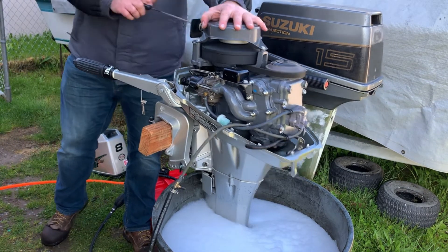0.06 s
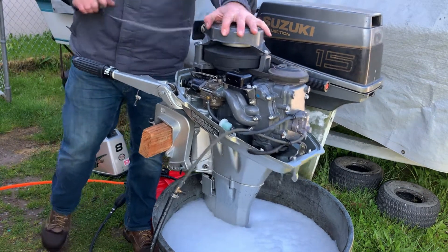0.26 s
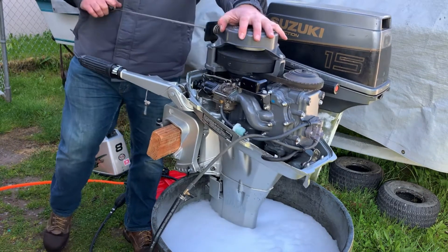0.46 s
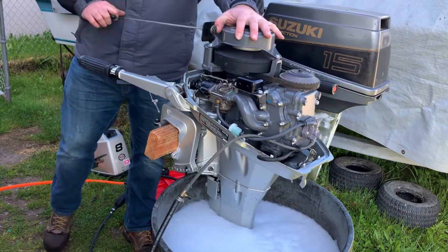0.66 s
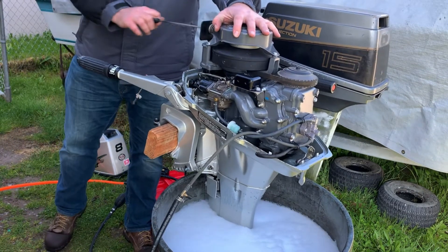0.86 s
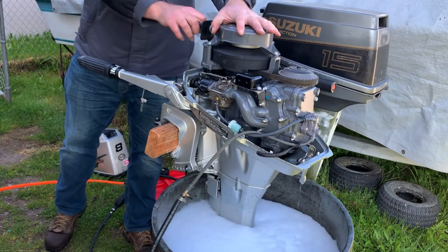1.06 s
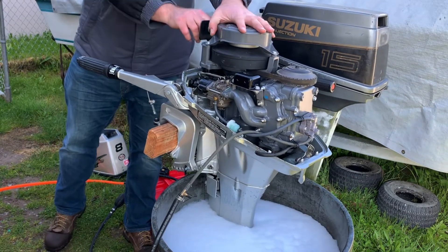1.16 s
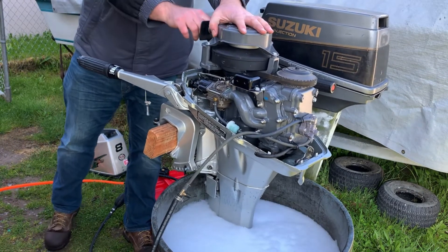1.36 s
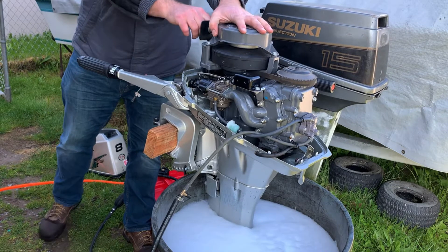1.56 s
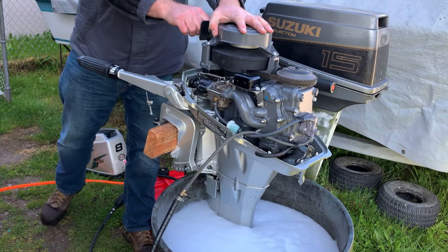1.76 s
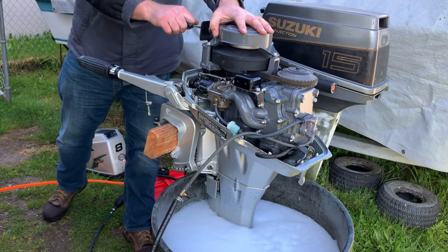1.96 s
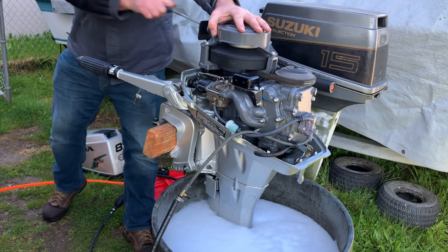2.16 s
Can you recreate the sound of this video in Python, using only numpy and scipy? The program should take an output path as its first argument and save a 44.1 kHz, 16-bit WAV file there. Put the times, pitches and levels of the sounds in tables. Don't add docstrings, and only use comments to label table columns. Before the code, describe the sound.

Sharp metallic ratchet clatter on a silent small outboard engine, loudest in the first half second, then a few clicks, soft thuds and a late weaker rattle, over faint distant traffic and engine drone in a yard.

```python
import sys
import numpy as np
from scipy import signal
from scipy.fft import rfft, irfft
from scipy.io import wavfile

SR = 44100
rng = np.random.default_rng(int(sys.argv[2]) if len(sys.argv) > 2 else 0)


def volts_from_decibels(level):
    exponent = np.asarray(level, float) / 20
    return 10 ** exponent


def to_wav(s):
    ch = np.atleast_2d(s).T
    pcm = np.round(np.clip(ch, -1, 1) * 32767)
    wavfile.write(sys.argv[1], SR, pcm.astype(np.int16))


N = 97020
FFT_HZ = np.arange(N // 2 + 1) * SR / N


def rms_one(x):
    return x / np.sqrt(np.mean(x ** 2) + 1e-20)


def in_time(rows):
    t_s, *columns = np.transpose(rows)
    return [np.interp(np.arange(N) / SR, t_s, column) for column in columns]


def at_hz(points, hz):
    point_hz, value = np.transpose(points)
    return np.interp(np.log(hz + 1), np.log(point_hz + 1), value)


def drift(rate_hz):
    r = np.exp(-80 * np.pi * rate_hz / SR)
    white = rng.standard_normal(N // 40 + 2002)
    slow = signal.lfilter([1], [1, -2 * r, r * r], white)[2000:]
    return np.interp(np.arange(N) / 40, np.arange(len(slow)), rms_one(slow))


def narrow_noise(turn, width_hz, steady=0):
    return (steady + drift(width_hz)) * np.cos(turn) + drift(width_hz) * np.sin(turn)


def bandpass(x, low_hz, high_hz, order=2):
    return signal.sosfilt(signal.butter(order, [low_hz, high_hz], "band", fs=SR, output="sos"), x)


def lowpass(x, cut_hz):
    return signal.lfilter(*signal.butter(2, cut_hz, fs=SR), x)


def ring(x, hz, t60_s):
    r, w = volts_from_decibels(-60 / (t60_s * SR)), 2 * np.pi * hz / SR
    gain = 2 * np.sin(w) * np.sqrt(1 - r)
    return signal.lfilter([0, gain], [1, -2 * r * np.cos(w), r * r], x + 1e-18)


def coloured(spectrum, white):
    inside = (FFT_HZ > spectrum[0][0]) & (FFT_HZ < spectrum[-1][0])
    return rms_one(irfft(rfft(white) * volts_from_decibels(at_hz(spectrum, FFT_HZ)) * inside, N))


def grains(size):
    strength_db = 3.5 * np.minimum(rng.exponential(1, size), 4)
    return rms_one(volts_from_decibels(strength_db) * rng.standard_normal(size))


# f/Hz, density/dB [dB per Hz]
TRAFFIC_SPECTRUM = [(20, -29.5), (48, -13), (70, -2.5), (110, -9), (350, -23.5), (900, -32), (2800, -44),
                    (4800, -62.5), (16000, -63.5)]
# f/Hz, likeness/1 [0..1]
FAR_LIKENESS = [(30, 0.8), (100, .9), (300, 0.39), (1000, 0.25), (3000, 0.43), (8000, 0.56)]
TRAFFIC_DB = -50


def traffic():
    alike = np.clip(at_hz(FAR_LIKENESS, FFT_HZ), 0, 1)
    mid, side = (rfft(coloured(TRAFFIC_SPECTRUM, rng.standard_normal(N))) for _ in range(2))
    mid = np.sqrt(.5 + alike * .5) * mid
    side = np.sqrt(.5 - alike * .5) * side
    pair = np.array([irfft(mid + side, N), irfft(mid - side, N)])
    return volts_from_decibels(TRAFFIC_DB + .5 * drift(2.4)) * pair


# t/s, f/Hz, level/dB
ENGINE_PITCH = [(0, 73.38, -62), (.3, 79.92, -79), (.55, 67.64, -49.5), (.85, 74.37, -69.5),
                (1.15, 67.06, -54), (1.44, 71.1, -38.5), (1.6, 67.4, -60), (1.7, 82.34, -60.5),
                (1.93, 76.8, -40.5), (2.05, 69.5, -79), (2.2, 70.8, -67.5)]
ENGINE_WIDTH_HZ = 6
HUM_HZ, HUM_WIDTH_HZ, HUM_DB = 124.6, 2.9, -59


def drone():
    hz, db = in_time(ENGINE_PITCH)
    engine = narrow_noise(2 * np.pi * np.cumsum(hz) / SR, ENGINE_WIDTH_HZ, steady=0.42) / 1.6
    hum = narrow_noise(2 * np.pi * HUM_HZ * np.arange(N) / SR, HUM_WIDTH_HZ)
    return volts_from_decibels(db) * engine + volts_from_decibels(HUM_DB) * hum


# t/s, level/dB, dull share/dB
ROPE_RUB = [(0, -69.5, -1), (.09, -65.5, 5), (.15, -48, -4), (.18, -51.5, -10), (.2, -55.5, 5.5),
            (.3, -56.5, 1), (.45, -62.5, -7), (.58, -71, 5.5), (.72, -66.5, 0), (.95, -65, -8.5),
            (1.05, -71, 2.5), (1.15, -80, 6.5), (1.74, -87.5, 11), (1.82, -59.5, -3), (1.96, -74, -3),
            (2.06, -77.5, -1.5), (2.14, -62.5, 6.5), (2.2, -61, 10.5)]
# f/Hz, density/dB [dB per Hz]
ROPE_HISS = [(1500, -2), (2500, -3.5), (4500, -6), (6800, -12), (9200, -6.5), (11600, -11.5),
             (14000, -14.5), (16000, -17)]
# f/Hz, density/dB [dB per Hz]
ROPE_DRAG = [(350, -16.5), (600, -3), (900, -4.5), (1400, -5.5), (1900, -16.5), (3000, -12.5)]
ROPE_RING_DB, ROPE_BOOM_GAIN = -11, .8


def rope():
    level_db, dull_db = in_time(ROPE_RUB)
    rub = grains(N)
    pawl = rms_one(sum(volts_from_decibels(db) * ring(rub, hz, METAL_T60_S) for hz, db in PAWL_MODES))
    bright = coloured(ROPE_HISS, rub) + volts_from_decibels(ROPE_RING_DB) * pawl
    drag = coloured(ROPE_DRAG, rng.standard_normal(N))
    boom = rms_one(sum(ring(drag, hz, 2 * HOUSING_T60_S) for hz, _ in HOUSING_MODES))
    dull = rms_one(drag + ROPE_BOOM_GAIN * boom) * volts_from_decibels(dull_db + drift(5))
    return volts_from_decibels(level_db + drift(18)) * (bright + dull)


def wide_rope():
    return rope() + volts_from_decibels(-0.5) * lowpass(rope(), 3000) * [[1], [-1]]


KNOCK_TIMES = [.012, .060, .224, .2322, .2727, .3398, .3535, .372, .376, .3795, .400, .438, .600, .6357,
               .652, .670, 1.085, 1.102, 1.7948, 1.806, 1.824, 1.830, 1.8585, 1.8615, 1.8978, 1.9015, 1.922,
               1.935]
# peak level/dB, housing share/dB, pawl share/dB, chatter length/s
KNOCK_FORCE = [(-41, 6.5, -7.5, 0.016), (-59, 16, -20, 0.018), (-26, -13, -11.5, 0.0046),
               (-15.5, -16, 2, 0.007), (-21.5, -10, 1.5, 0.0033), (-35, -15.5, 14, 0.0027),
               (-31, -11.5, -2, 0.027), (-26, -15.5, -6.5, .004), (-8.5, -6, -4.5, .003),
               (-13.5, 2.5, 0.5, 0.0073), (-27.5, -24, -7, 0.0049), (-47.5, 6.5, -24, 0.023),
               (-53, -14, -3, 0.0055), (-32.5, -8, -5, 0.0026), (-22.5, -23, -3.5, 0.0025),
               (-45, 8.5, -10.5, 0.003), (-45, -19.5, -17.5, 0.0028), (-42.5, -22, -28.5, 0.0015),
               (-32, -25, -3, 0.0036), (-40.5, -28, -4, 0.0033), (-40, -20, 8.5, 0.0025),
               (-43.5, -6, 6, 0.0067), (-34.5, 3.5, 4.5, 0.0033), (-28.5, 4, -8, 0.0016),
               (-25, -39, 6.5, 0.005), (-28, 14, -2, 0.006), (-31, 6.5, -9, 0.0088),
               (-34.5, -28, -26, 0.0017)]
# f/Hz, level/dB
HOUSING_MODES = [(210, -4), (294, -9.5), (450, -17), (590, -24.5), (680, 0), (957, 1), (1117, -2),
                 (1350, -13.5)]
# f/Hz, level/dB
CUP_MODES = [(1660, -1), (2200, 3), (2500, 2.5), (3170, 1), (3600, -1.5), (4460, 1.5), (5160, -4),
             (5650, -26), (6300, -15.5), (6950, -3), (7550, -18.5)]
# f/Hz, level/dB
PAWL_MODES = [(8200, -10.5), (8580, 8), (8940, -2), (9300, -4.5), (9640, 7.5), (10300, 4), (10800, -11),
              (12000, -15.5), (12500, -1.5), (13350, -7.5), (13750, -3.5), (14250, 2.5), (15000, -18)]
# contact t/s, f/Hz, level/dB
CONTACT_ACCENTS = [(.2322, 1315, 5.5), (.2322, 1610, 2), (.2322, 2280, 2), (.2727, 1685, 6),
                   (.2727, 1000, 2.5), (.2727, 2990, 9), (.3398, 8640, 29), (.3398, 13800, 10.5),
                   (.3398, 14200, 9), (.3795, 626, 5), (.3795, 914, 6.5), (.3795, 720, 0.5),
                   (.652, 2577, 5.5), (.652, 1046, -0.5), (.652, 700, -7), (1.7948, 1050, 2.5),
                   (1.824, 2250, 11), (1.9015, 1600, 9), (1.9015, 2100, 6), (.652, 3720, 1),
                   (1.085, 1393, 17.5), (1.102, 777, 17.5), (1.830, 8740, 22.5), (1.8615, 2840, 11.5),
                   (1.8615, 4100, 12)]
HOUSING_T60_S, METAL_T60_S, ACCENT_T60_S = .024, .009, .016
ATTACK_SHARE, CHATTER_T60_S, TAIL_DB, TAIL_T60_S = 0.04, 0.031, -21, 0.18
CRACK_LOW_HZ, CRACK_SPLIT_HZ, CRACK_HIGH_HZ = 800, 7000, 13500
CRACK_DB, CRACK_TOP_DB = 9.5, 14.5
COLOUR_DB, DETUNE = 2.0, .02


def chatter(t, length_s):
    attack = np.minimum(t / (ATTACK_SHARE * length_s), 1)
    after = np.maximum(t - length_s, 0)
    body = volts_from_decibels(-60 * after / CHATTER_T60_S - 1.45 * np.minimum(t / length_s, 1))
    tail = volts_from_decibels(TAIL_DB - 60 * t / TAIL_T60_S)
    return attack * (body + tail) * grains(len(t))


def metal(push, modes, share_db):
    out = 0
    for k, (hz, mode_db) in enumerate(modes):
        gain = (-1) ** k * volts_from_decibels(mode_db + share_db + COLOUR_DB * rng.normal())
        out = out + gain * ring(push, hz * rng.normal(1, DETUNE), METAL_T60_S)
    return out


def knocks():
    out, t = np.zeros(N + SR), np.arange(SR // 5) / SR
    for s, (db, housing_db, pawl_db, length_s) in zip(KNOCK_TIMES, KNOCK_FORCE):
        push = chatter(t, length_s)
        sound = volts_from_decibels(CRACK_DB) * bandpass(push, CRACK_LOW_HZ, CRACK_SPLIT_HZ, order=3)
        top = bandpass(push, CRACK_SPLIT_HZ, CRACK_HIGH_HZ)
        sound = sound + volts_from_decibels(CRACK_TOP_DB + pawl_db) * top
        for hz, mode_db in HOUSING_MODES:
            gain = volts_from_decibels(mode_db + housing_db + rng.normal())
            sound = sound + gain * ring(push, hz, HOUSING_T60_S)
        sound = sound + metal(push, CUP_MODES, 0) + metal(push, PAWL_MODES, pawl_db)
        for at_s, hz, accent_db in CONTACT_ACCENTS:
            if abs(at_s - s) < .0025:
                sound = sound + volts_from_decibels(accent_db) * ring(push, hz, ACCENT_T60_S)
        start = int(s * SR)
        out[start:start + len(t)] += volts_from_decibels(db - 21.5) * sound
    return signal.sosfilt(signal.butter(2, 310, "high", fs=SR, output="sos"), out[:N])


TICK_TIMES = [.0135, .2325, .2339, .2351, .2365, .2381, .2403, .2432, .2463, .2731, .2742, .2760, .3403,
              .3426, .3550, .3581, .3623, .3766, .3778, .3790, .3804, .3822, .3859, .3878, .3907, .3948,
              .4016, .6361, .6372, .6530, .6543, .6608, .6722, 1.0851, 1.1021, 1.7952, 1.7971, 1.8069,
              1.8254, 1.8319, 1.8368, 1.8605, 1.8622, 1.8641, 1.8982, 1.9006, 1.9019, 1.9060, 1.9091,
              1.9135, 1.9229, 1.9371]
# peak level/dB, bright over dull/dB
TICK_LEVELS = [(-46, -3), (-10, 10), (-14, 9), (-17, 6), (-15, 7), (-12, 10), (-22, 5), (-23, 5), (-25, 6),
               (-24, 3), (-19, 4), (-23, 4), (-24, 19), (-27, 19), (-26, 11), (-27, 13), (-36, 11),
               (-16, 12), (-19, 2), (-14, 6), (-10, 8), (-16, 0), (-17, 5), (-17, 7), (-25, 4), (-26, 4),
               (-32, 4), (-39, 6), (-40, 4), (-19, 7), (-27, -2), (-38, 8), (-40, 8), (-51, -14),
               (-48, -18), (-34, 6), (-36, 4), (-44, 5), (-43, 4), (-34, 12), (-36, 16), (-33, 1), (-31, 1),
               (-29, 6), (-19, 19), (-21, 19), (-26, 13), (-31, 6), (-27, 5), (-30, -1), (-40, -4),
               (-38, 1)]
TICK_LOW_HZ, TICK_SPLIT_HZ, TICK_HIGH_HZ = 650, 7000, 12800
TICK_T60_S, TICK_DB = .006, -1.5


def ticks():
    out, t = np.zeros(N + SR), np.arange(SR // 50) / SR
    for s, (db, bright_db) in zip(TICK_TIMES, TICK_LEVELS):
        white = rng.standard_normal(len(t))
        dull = rms_one(bandpass(white, TICK_LOW_HZ, TICK_SPLIT_HZ))
        bright = rms_one(bandpass(white, TICK_SPLIT_HZ, TICK_HIGH_HZ))
        snap = (dull + volts_from_decibels(bright_db) * bright) * volts_from_decibels(-60 * t / TICK_T60_S)
        start = int(s * SR)
        out[start:start + len(t)] += volts_from_decibels(db + TICK_DB) * snap / np.abs(snap).max()
    return out[:N]


# t/s, f/Hz, level/dB, t60/s
SOFT_THUDS = [
    (0.018, 380, -49, 0.035),
    (.064, 640, -39, .03),
    (.3805, 625, -18.5, .035),
    (1.902, 737, -31.5, 0.027),
    (.615, 283, -41, 0.043),
    (0.81, 96.6, -38.5, 0.086),
    (.93, 420, -40.5, 0.026),
    (1, 190, -49.5, 0.11),
    (0.861, 183, -46, 0.054),
]


def thuds():
    t, out = np.arange(N) / SR, 0
    for s, hz, db, t60_s in SOFT_THUDS:
        fade = volts_from_decibels(db - 60 * np.clip(t - s, 0, 1) / t60_s)
        onset = np.clip((t - s) / 0.0034, 0, 1)
        out = out + fade * onset * np.sin(2 * np.pi * hz * (t - s))
    return out


# start t/s, touched t/s, f/Hz
SPRING_MODES = [
    (.258, .340, 4684),
    (.245, .372, 5681),
    (.236, .300, 1667),
    (.280, .335, 8597),
    (.240, .320, 8093),
    (.285, .340, 13720),
    (1.815, 1.858, 5690),
]
SPRING_LEVELS = [-42, -46, -47, -60, -51.5, -61, -61.5]
SPRING_RISE_S, SPRING_STOP_S, SPRING_T60_S = .008, .007, 0.54


def spring():
    t, out = np.arange(N) / SR, 0
    for (start, stop, hz), db in zip(SPRING_MODES, SPRING_LEVELS):
        gate = np.clip((t - start) / SPRING_RISE_S, 0, 1) * np.clip((stop - t) / SPRING_STOP_S, 0, 1)
        fade = volts_from_decibels(db + 5.5 - 60 * np.clip(t - start, 0, 1) / SPRING_T60_S)
        out = out + gate * fade * np.sin(2 * np.pi * (hz * t + rng.random()))
    return out


# left lag t/s, right lag t/s, level/dB
YARD_ECHOES = [(.011, .014, -12.5), (0.024, .019, -18.5), (.037, .041, -31.5)]


def with_echoes(near):
    out, dull = np.array([near, near]), lowpass(near, 4500)
    for left_s, right_s, db in YARD_ECHOES:
        for side, lag_s in enumerate((left_s, right_s)):
            lag = int(lag_s * SR)
            out[side, lag:] += volts_from_decibels(db) * dull[:-lag]
    return out


def scene():
    blows, singing = knocks(), spring()
    rubbing = wide_rope()
    far = traffic() + drone()
    near = blows + ticks() + singing * volts_from_decibels(3.5 * drift(29.93))
    return with_echoes(near) + rubbing + thuds() + far


# low f/Hz, high f/Hz
SCATTER_BAND = (3600, 6800)
SCATTER_T60_S, SCATTER_DB = .012, -0.5


def scattered(pair):
    t = np.arange(SR // 100) / SR
    smear = rng.standard_normal(len(t)) * volts_from_decibels(-60 * t / SCATTER_T60_S)
    band = bandpass(pair.mean(axis=0), *SCATTER_BAND)
    smeared = np.convolve(band, smear / np.linalg.norm(smear))[:N]
    return pair + volts_from_decibels(SCATTER_DB) * smeared * [[1], [-1]]


# f/Hz, phase/rad
PORT_TURN = [(0, 0), (500, .2), (1000, .5), (1500, .25), (2000, .5), (3400, 1.6), (5800, 1.2), (7300, 2.4),
             (9300, 0), (10400, -1.5), (11650, -3.14), (12900, -4.6), (13900, -6.28), (16500, -9.6)]
# f/Hz, level/dB
PORT_LEAN = [(60, -.6), (300, -2.2), (1000, -1.2), (3000, -3), (5200, -6), (6500, 2), (8000, -.2)]


def at_ports(pair):
    turn = np.interp(FFT_HZ, *np.transpose(PORT_TURN)) / 2
    lean = volts_from_decibels(at_hz(PORT_LEAN, FFT_HZ) / 2) * np.exp(1j * turn)
    return irfft(rfft(pair) * [lean, 1 / lean], N)


def top_cut(x):
    return signal.sosfilt(signal.butter(12, 16540, fs=SR, output="sos"), x)


def record(dry):
    mix = at_ports(scattered(dry))
    return top_cut(mix)


dry = scene()
out = record(dry)
to_wav(out)
```